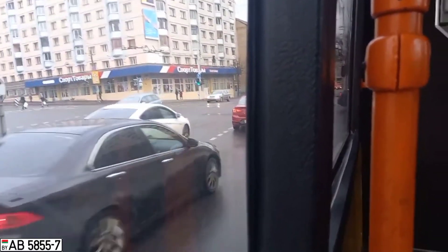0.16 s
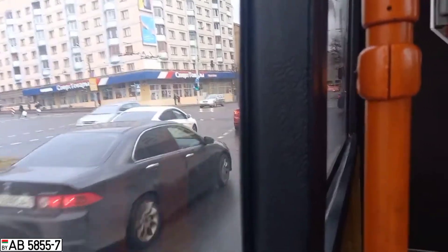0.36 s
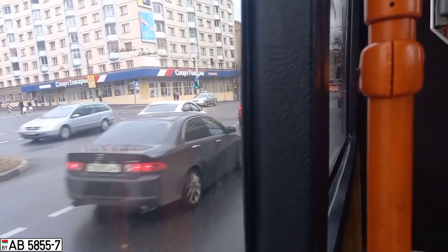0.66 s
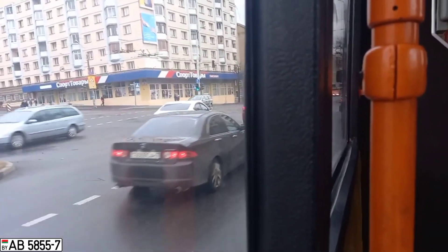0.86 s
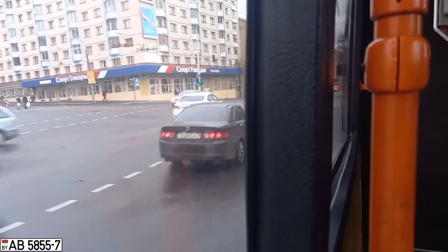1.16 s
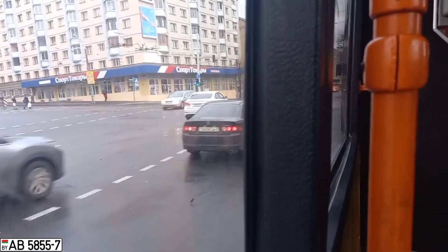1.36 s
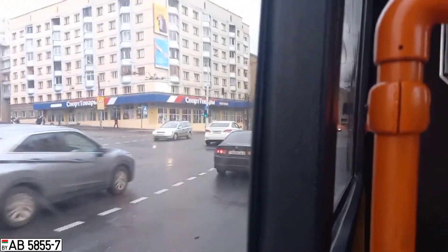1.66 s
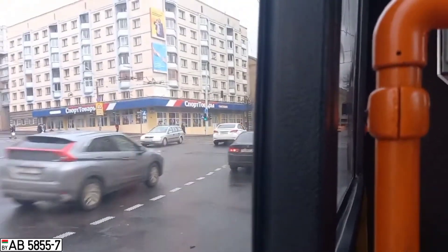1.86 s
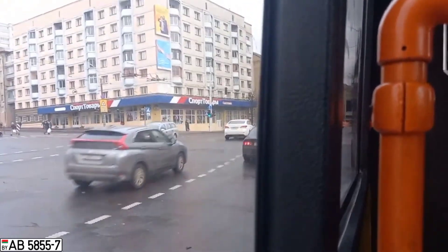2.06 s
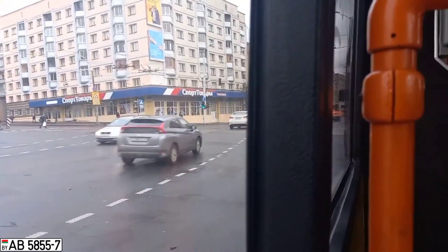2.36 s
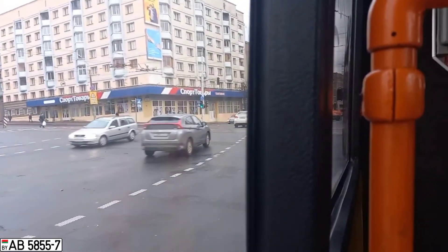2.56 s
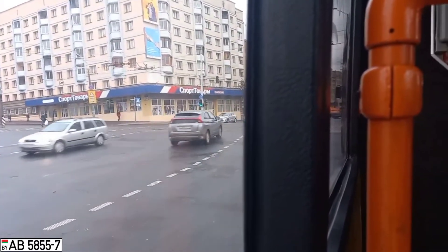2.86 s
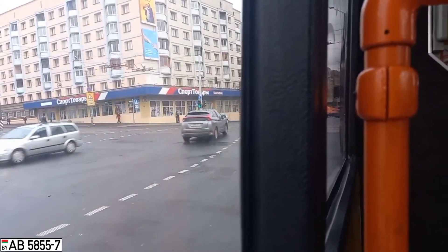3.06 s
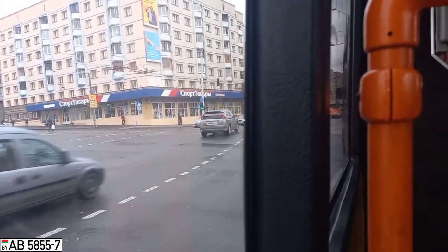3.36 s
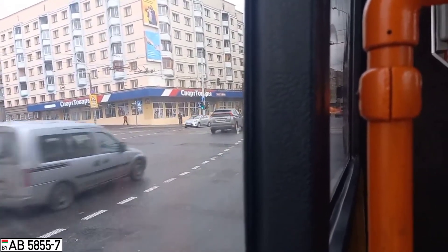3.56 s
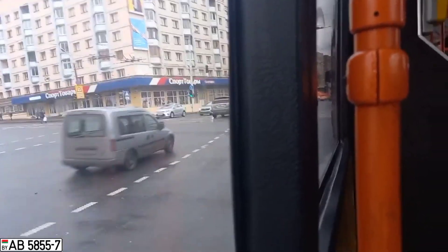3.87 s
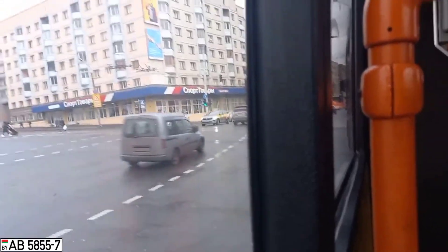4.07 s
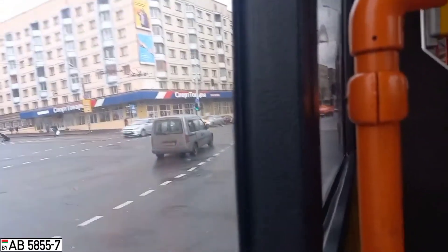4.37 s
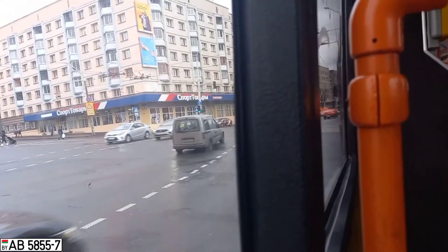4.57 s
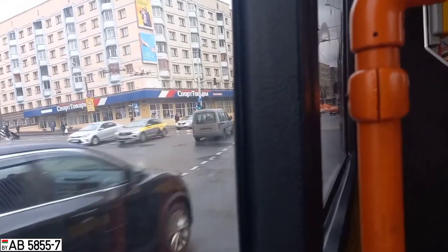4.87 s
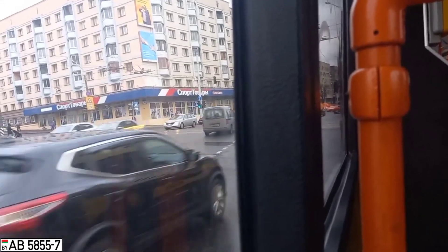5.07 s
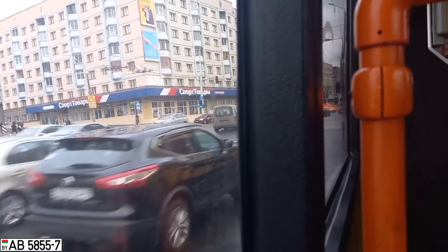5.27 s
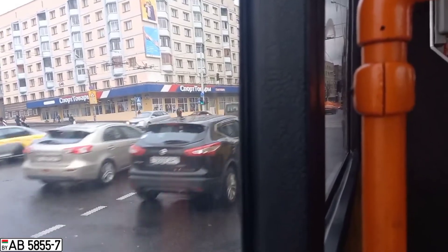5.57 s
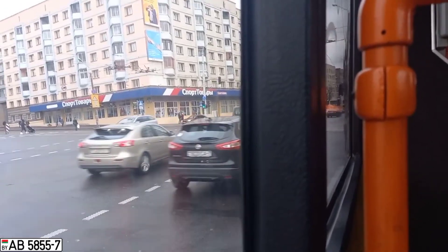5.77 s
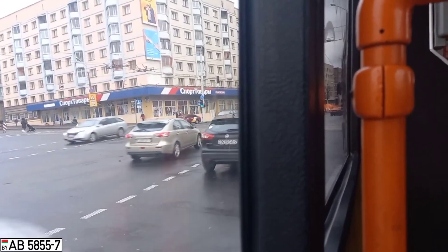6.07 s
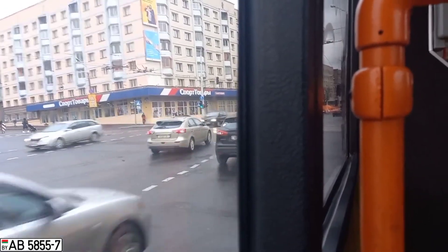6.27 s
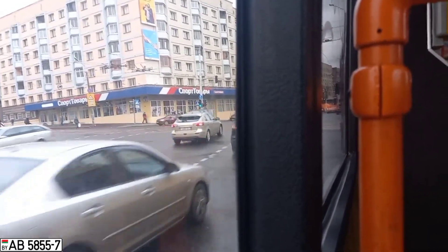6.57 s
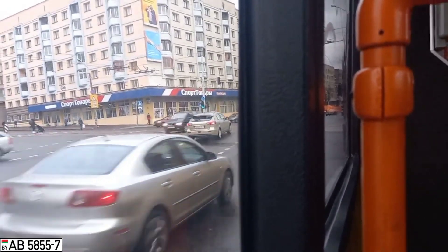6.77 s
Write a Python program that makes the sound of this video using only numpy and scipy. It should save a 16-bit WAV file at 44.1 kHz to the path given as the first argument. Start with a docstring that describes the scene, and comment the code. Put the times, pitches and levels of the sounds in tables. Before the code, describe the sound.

Heard at the window inside a bus, the idling diesel rumbles, booms and buzzes in the panels. A second big diesel revs up close by, dips for a gear change with three quick whistling puffs of air, then climbs again as it fades. Two fainter puffs follow. Throughout, cars pass outside one after another, their tyres roaring and spraying on the wet road, and the traffic slowly thickens.

```python
"""City bus at a wet junction

Inside an idling bus, the diesel's firings boom in the cabin and buzz in its panels. A second big diesel
revs up close by, changes gear with puffs of compressed air from a valve and pulls away.
Cars drone past outside, and the roar and spray of their wet tyres come through the windows."""
import sys
import numpy as np
from scipy import signal
from scipy.fft import rfft, irfft
from scipy.io import wavfile
from scipy.ndimage import map_coordinates

SR = 44100
rng = np.random.default_rng(int(sys.argv[2]) if len(sys.argv) > 2 else 0)


def file_out(sig):
    """Save sig as 16-bit WAV at sys.argv[1]."""
    # one column per channel
    cols = np.atleast_2d(sig).T
    # limit, then scale
    lim = np.clip(cols, -1, 1)
    pcm = np.round(lim * 32767).astype(np.int16)
    wavfile.write(sys.argv[1], SR, pcm)


N = 305613
TIME = np.arange(N) / SR
FREQ = np.maximum(np.arange(N // 2 + 1) * SR / N, 1)

# stereo width of the noise beds: (frequency [Hz], side minus mid [dB])
BED_WIDTH = [(60, -25), (130, -29), (250, -10), (500, -6.5), (1000, 3), (2000, 0), (4000, 0.5),
             (12000, -19.5)]
# their balance: (frequency [Hz], left minus right [dB])
BED_BALANCE = [(80, -2.5), (280, 2), (400, -2), (540, 0.5), (700, 2), (880, -2), (1200, 4), (1500, -1),
               (2000, -5.5), (3000, -3), (6000, -1.5), (6700, -12), (15000, -11)]
# tone of each noise bed, low to high: (frequency [Hz], relative level [dB])
RUMBLE_EQ = [(15, -44.5), (35, -23), (50, -13), (65, -1), (82, 2), (100, -2), (125, -3.5), (165, -9),
             (205, -7), (250, -9.5), (300, -18.5), (400, -44.5)]
LOW_ROAR_EQ = [(200, -22), (300, 1.5), (350, 0.5), (400, 1), (470, -1), (530, 0), (620, -4.5), (750, -8),
               (950, -33), (1500, -38)]
TYRE_ROAR_EQ = [(500, -22), (780, 2), (1050, 3), (1300, -1.5), (1500, 1), (1810, -8.5), (1980, -3.5),
                (2400, -5), (2900, -10.5), (3600, -39.5)]
SPRAY_EQ = [(2200, -13.5), (3000, 5), (3600, 3.5), (4950, 0.5), (5300, 6.5), (6200, 7.5), (7000, -4),
            (16000, -3.5)]
SPLASH_EQ = [(3000, -23.5), (5000, -9.5), (6200, 1.5), (10000, 5.5), (16000, -4.5)]
# car pass-bys: (time when closest [s], tyre roar [dB], splash [dB])
PASS_BYS = [(0.1, -49, -46.5), (1.899, -47, -60.5), (3.65, -45.5, -44), (4.95, -45.5, -67),
            (5.5, -47.5, -67), (6.6, -49, -58)]
# low drones of passing cars, brief engine whines and cabin buzzes:
# (peak time [s], half length [s], pitch [Hz], width [Hz], level [dB])
DRONES_AND_WHINES = [(0.408, 0.085, 470.5, 29, -37), (1.868, 0.11, 73, 6.4, -31),
                     (2.698, .25, 79.8, 6.7, -26), (2.747, 0.22, 508, 20, -42),
                     (3.085, 0.093, 426.8, 11, -39.5), (3.691, 0.78, 80.16, 8.56, -24.5),
                     (3.748, 0.33, 233.1, 13.77, -33.5), (4.735, 0.19, 72.6, 1.36, -17),
                     (6.08, 0.54, 81.53, 1.82, -22), (6.15, 0.23, 532.7, 14, -43.5),
                     (6.803, .3, 127, 24.4, -25)]
# the idle's cabin boom and panel buzz: (pitch [x firing rate], relative level [dB])
BOOM_PARTIALS = [(2, -19.5), (3, -0.5)]
BUZZ_PARTIALS = [(1, -45), (1.5, -43.5), (2, -37), (2.5, -28), (3.5, -51), (4, -38), (5, -32.5), (6, -40.5),
                 (7, -48), (8, -43), (9, -45.5), (10, -50.5), (13, -52), (14.5, -50), (20, -54.5)]
# fader on the boom: (time [s], level [dB])
BOOM_FADER = [(0, -48), (0.85, -25.5), (1.3, -19.5), (2.3, -20), (2.9, -26), (3.7, -15.5), (4.6, -21.5),
              (5.85, -22), (6.3, -35.5)]
# the departing engine's revs through two gears: (time [s], firing rate [Hz])
REV_CURVE = [(0, 79.2), (0.2, 82.6), (0.45, 89), (1.02, 98.6), (1.26, 99.3), (1.44, 81.6), (1.65, 78.2),
             (1.98, 78.2), (2.7, 85), (3.5, 90), (5.9, 117.7), (6.9, 120.3)]
# fader on its fundamental, ahead of the gear-change dip: (time [s], level [dB])
FIRING_FADER = [(0, -12), (0.14, -10), (0.7, -19.5), (1.2, -18.5), (1.58, -11), (2, -27), (2.2, -14),
                (2.7, -23.5), (3, -30.5), (4.6, -30.5), (5.35, -23.5), (6.1, -32.5)]
# its overtones up close, ahead of the cabin resonances: (pitch [x firing rate], level [dB])
EXHAUST_OVERTONES = [(2, -30), (3, -36), (4, -43.5), (5, -51.5), (6, -53.5), (7, -60.5), (8, -59)]
# cabin resonances: (centre [Hz], width [Hz], boost or cut [dB])
CABIN_MODES = [(158.75, 7.1, 11.5), (171.8, 7.6, 8), (190.5, 9, 8.5), (201, 6, -6.5), (236.8, 8, 7.5),
               (251.5, 13, 9.5), (315, 13, 4.5)]
# air puffs: (time when fully open [s], attack [s], hold [s], release [s], hiss [dB],
# whistle over hiss [dB], squeal over hiss [dB], left minus right [dB])
AIR_PUFFS = [(1.272, .11, 0.088, 0.14, -45, 13, -14, -11), (1.47, 0.07, 0.043, .15, -44.5, 4, -4.5, -9),
             (1.77, 0.066, 0.13, 0.095, -32.5, -2, -21, -5.5),
             (3.372, .025, 0.16, 0.23, -48.5, -0.5, -22.5, -6.5), (4.03, .02, .03, 0.043, -50, 1, -22, -3)]
# peaks of the valve's whistle: (centre [Hz], width [Hz], relative level [dB])
VALVE_PEAKS = [(6480, 560, 0), (10300, 3000, 2), (14400, 2100, 9.5)]
# microphone colour: (frequency [Hz], gain [dB])
MIC_EQ = [(20, 1.5), (6400, -0.5), (6850, -8.5), (7350, -23), (8050, -29), (8500, -22), (9800, -20.5),
          (12800, -26), (15500, -24)]


def undb(db):
    """Decibels to gain."""
    return 10 ** (np.asarray(db) / 20)


def automation(table):
    """A (time, value) table drawn out to one value a sample."""
    return np.interp(TIME, *np.transpose(table))


def eq_curve(points):
    """Gain at every frequency from (frequency [Hz], level [dB]) points."""
    hz, db = np.transpose(points)
    return undb(np.interp(np.log(FREQ), np.log(hz), db))


def bell(hz, centre, width):
    """A resonant peak of height 1."""
    return 1 / (1 + ((hz - centre) / (width / 2)) ** 2)


def swell(peak_s, half_s):
    """A smooth rise and fall around the peak."""
    return np.exp(-.5 * ((TIME - peak_s) / half_s) ** 2)


def noise(gain):
    """Noise of rms 1 with the given gain over frequency."""
    x = irfft(rfft(rng.standard_normal(N)) * gain, N)
    return x / np.sqrt(np.mean(x ** 2))


def wobble(rate_hz):
    """Smooth random modulation of rms 1."""
    return noise(np.exp(-.5 * (FREQ / rate_hz) ** 2))


def pan(x, db):
    """Lean a sound to the left (positive) or right."""
    return x * undb(np.array([[db], [-db]]) / 2)


def late_left(pair, lag_s=0.0003):
    """The deepest tones cross the cabin and reach the left ear a little later."""
    return np.array([np.interp(TIME - lag_s, TIME, pair[0]), pair[1]])


def bed(eq):
    """Noise that fills the cabin, near mono in the bass and wide in the mids; its centre has rms 1."""
    mid, side = (rfft(rng.standard_normal(N)) * eq_curve(eq) for _ in range(2))
    side = side * eq_curve(BED_WIDTH)
    lean = np.sqrt(eq_curve(BED_BALANCE))
    pair = irfft(np.array([(mid + side) * lean, (mid - side) / lean]), N)
    return pair / np.std(pair.mean(axis=0))


def engine_tone(firings, partials, rough, rate_hz):
    """Partials locked to the firings; uneven combustion shakes the level and phase of each."""
    out = 0
    for multiple, db in partials:
        tone = np.exp(2j * np.pi * (multiple * firings + rng.random()))
        shake = 1 + rough * (wobble(rate_hz) + 1j * wobble(rate_hz))
        out = out + undb(db) * np.sqrt(2) * np.imag(tone * shake)
    return out


def body_rumble(build_db_per_s=.5):
    """The bus body rumbles, growing with the traffic."""
    return bed(RUMBLE_EQ) * undb(-26.5 + build_db_per_s * TIME)


def traffic_wash(firings, build_db_per_s=0.3841, pass_half_s=0.48):
    """Wet tyres roar and spray, louder as each car passes; the roar pulses with the idle's chatter."""
    build_db = build_db_per_s * TIME  # the traffic thickens as the queue moves off
    passes = [undb(db) / np.hypot(1, (TIME - s) / pass_half_s) for s, db, _ in PASS_BYS]  # 1 / distance
    cars = np.linalg.norm(passes, axis=0)
    # fittings chatter with each firing; unequal cylinders alternate strong and weak beats
    chatter = 1 + 0.1 * (np.cos(2 * np.pi * firings) + np.cos(np.pi * firings))
    low_roar = bed(LOW_ROAR_EQ) * np.hypot(undb(-39.5 + build_db), undb(3) * cars) * chatter
    tyre_roar = bed(TYRE_ROAR_EQ) * np.hypot(undb(-47.5 + build_db), cars)
    tyre_roar *= undb(.5 * wobble(25)) * np.sqrt(chatter)
    spray = bed(SPRAY_EQ) * np.hypot(undb(-52.4 + build_db), undb(-8) * cars)
    grain = undb(1.5 * wobble(280))
    return low_roar + tyre_roar + spray * grain


def drones_and_whines():
    """Narrow tones swell and fade, almost centred, a touch to the right."""
    out = 0
    for peak_s, half_s, hz, width_hz, db in DRONES_AND_WHINES:
        waver = np.cumsum(width_hz / 2 * wobble(max(width_hz, 3))) / SR
        tone = np.sqrt(2) * np.sin(2 * np.pi * (hz * TIME + waver))
        out = out + undb(db) * swell(peak_s, half_s) * tone
    return pan(out, db=-.6)


def splashes():
    """Water thrown up by the cars sizzles as each one passes."""
    envelope = sum(undb(db) * swell(s, half_s=.24) for s, _, db in PASS_BYS)
    return bed(SPLASH_EQ) * undb(1.5 * wobble(60)) * envelope


def idling_engine(firings):
    """Slow diesel firings boom in the cabin and buzz in its panels."""
    boom = undb(automation(BOOM_FADER)) * engine_tone(firings, BOOM_PARTIALS, rough=.1, rate_hz=3)
    buzz = undb(-0.5) * engine_tone(firings, BUZZ_PARTIALS, rough=.35, rate_hz=2.5)
    return late_left(pan(boom, db=-.8)) + pan(buzz, db=.4)


def cabin_gain(hz):
    """The cabin's resonances lift or swallow an overtone as it sweeps through them."""
    return undb(sum(db * bell(hz, centre, width) for centre, width, db in CABIN_MODES))


def departing_engine(leaves_s=1.93, recede_per_s=2.7):
    """The exhaust note climbs, drops at the gear change and climbs again; overtones fade as it leaves."""
    hz = automation(REV_CURVE)
    firings = np.cumsum(hz) / SR
    throttle_closed = swell(peak_s=1.318, half_s=0.061)  # the gear change
    distance = np.clip(1 + recede_per_s * (TIME - leaves_s), 1, 8.3)  # in starting distances
    fundamental = engine_tone(firings, [(1, 0)], rough=.08, rate_hz=6)
    fundamental *= undb(automation(FIRING_FADER) - 17.5 * throttle_closed)
    overtones = sum(cabin_gain(k * hz) * engine_tone(firings, [(k, db)], rough=.03 * k, rate_hz=5)
                    for k, db in EXHAUST_OVERTONES)
    overtones *= undb(-6 * throttle_closed) / distance
    return late_left(pan(fundamental, db=-1.4)) + pan(overtones, db=.4)


def air_puffs(flutter_db=1.3, sag_per_s=0.56):
    """Air hisses and whistles through a valve and squeals in its pipe; the whistle sags with pressure."""
    valve = sum(undb(db) * bell(FREQ, hz, width) for hz, width, db in VALVE_PEAKS)
    jet = eq_curve([(400, -24.5), (1200, -5), (5000, -4), (10000, 7.0), (13000, 7.5), (16000, -11.5)])
    hiss = (noise(jet) + np.array([noise(jet), noise(jet)])) / np.sqrt(2)  # half centred, half wide
    squeal = noise(bell(FREQ, centre=2530, width=470))
    flutter = undb(flutter_db * wobble(30))
    out = 0
    for open_s, attack, hold, release, db, whistle_db, squeal_db, pan_db in AIR_PUFFS:
        age = TIME - open_s
        flow = np.clip(1 + age / attack, 0, 1) * np.exp(-np.maximum(age - hold, 0) / release)
        pitch_ratio = np.clip(1.04 - sag_per_s * age, .94, 1.04)
        whistle = map_coordinates(noise(valve), [np.cumsum(pitch_ratio)], mode="mirror")  # varispeed
        air = hiss + undb(whistle_db) * whistle + undb(squeal_db) * squeal
        out = out + pan(undb(db) * flutter * flow * air, pan_db)
    return out


def scene(idle_hz=29.63, idle_drift=0.00403):
    """Both engines, the traffic and the air valve, heard at the window."""
    firings = np.cumsum(idle_hz * (1 + idle_drift * wobble(0.39))) / SR  # running count
    engines = idling_engine(firings) + departing_engine()
    background = drones_and_whines() + body_rumble() + traffic_wash(firings) + splashes()
    return background + engines + air_puffs()


def record(dry, high_cut_hz=15750):
    """The microphone is dull above 7 kHz, and a steep filter cuts the very top."""
    impulse = np.fft.fftshift(irfft(eq_curve(MIC_EQ), N))
    kernel = impulse[N // 2 - 256:N // 2 + 257] * np.hanning(513)
    coloured = signal.fftconvolve(dry, kernel[None], mode="same", axes=1)
    high_cut = signal.ellip(10, .2, 80, high_cut_hz, fs=SR, output="sos")
    return signal.sosfilt(high_cut, coloured)


dry = scene()
out = record(dry)
file_out(out)
```